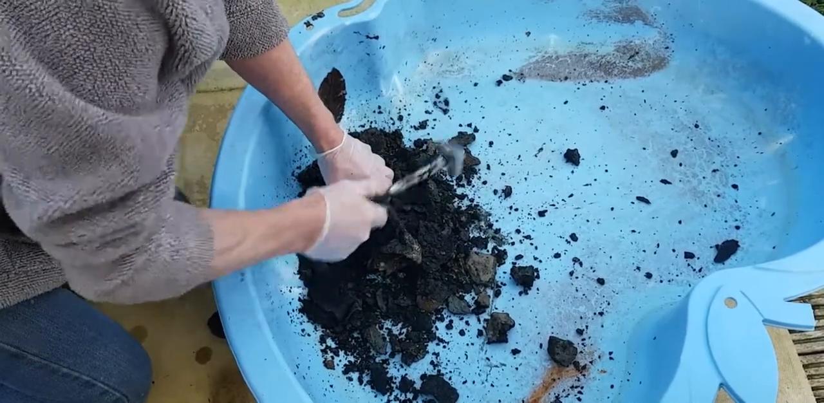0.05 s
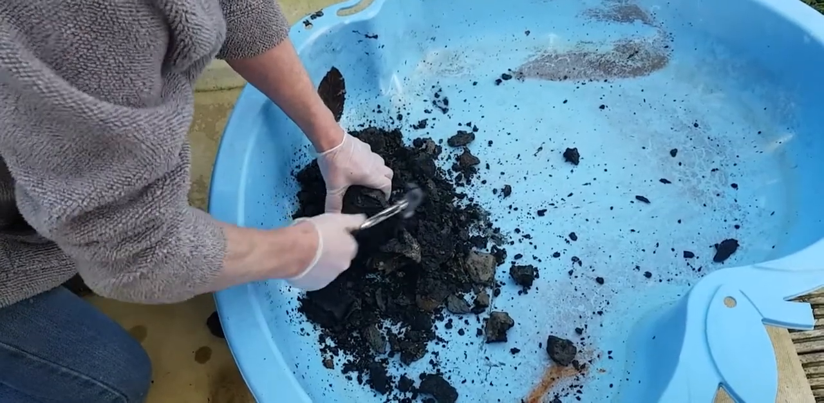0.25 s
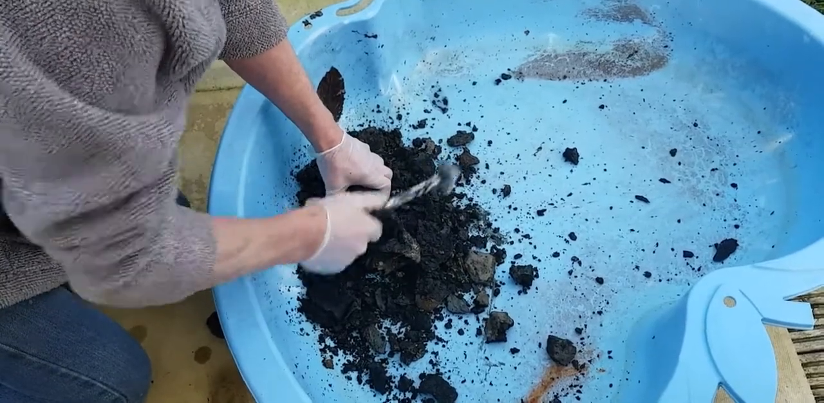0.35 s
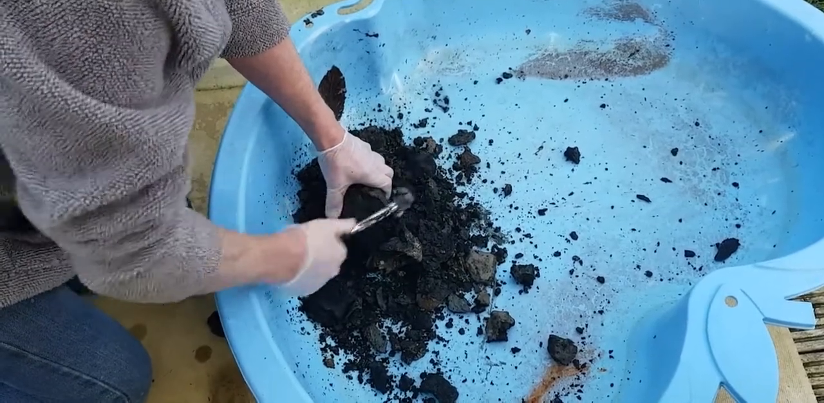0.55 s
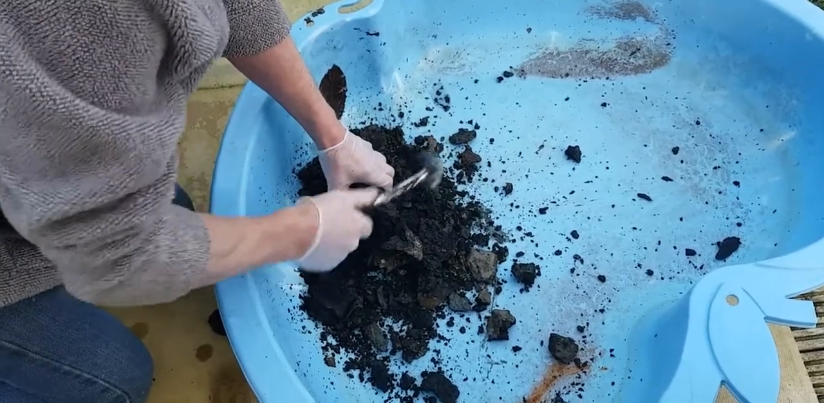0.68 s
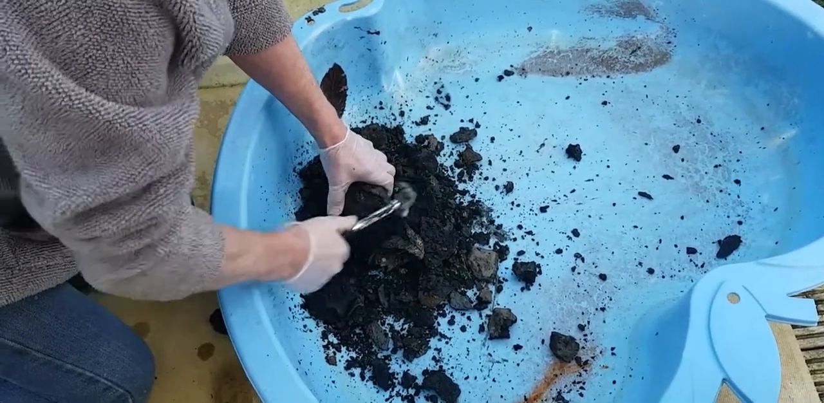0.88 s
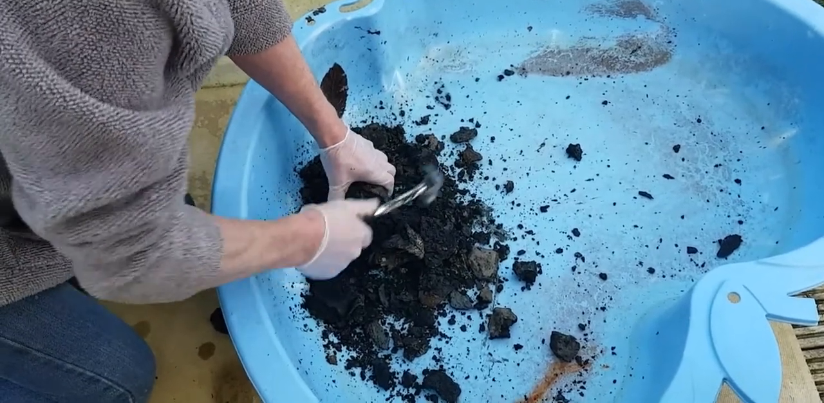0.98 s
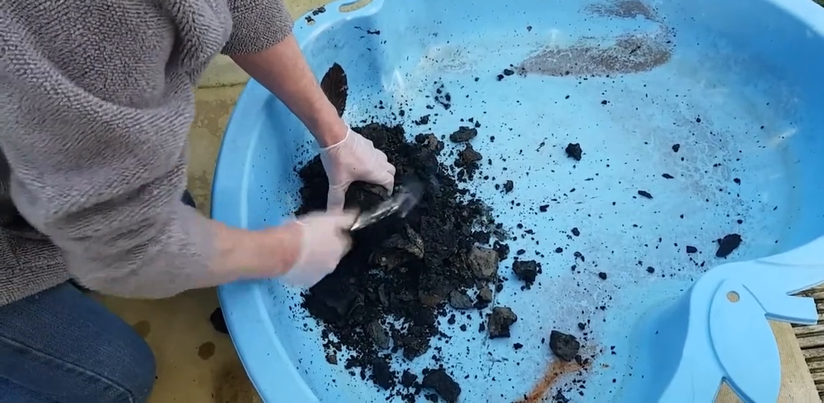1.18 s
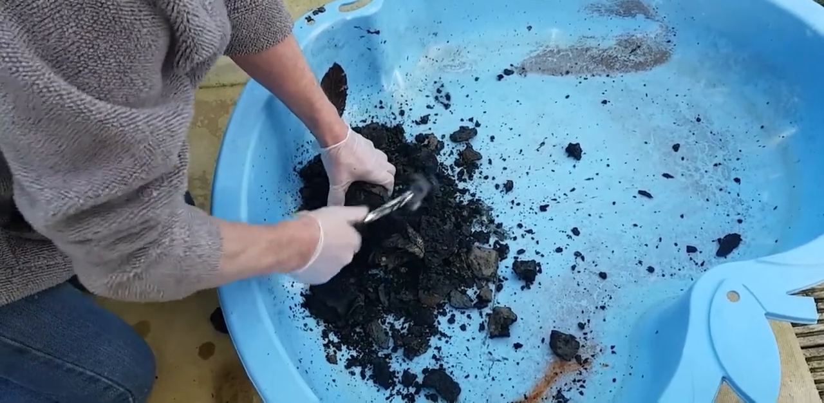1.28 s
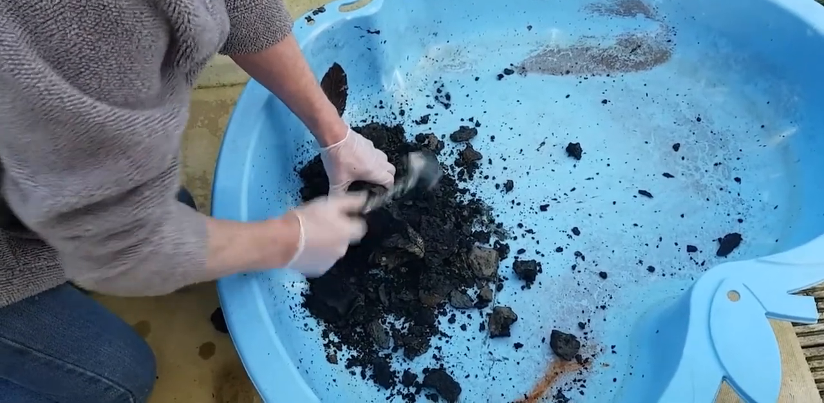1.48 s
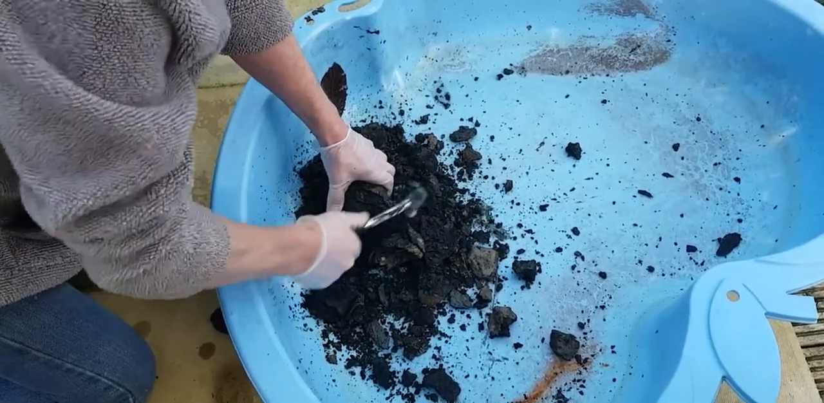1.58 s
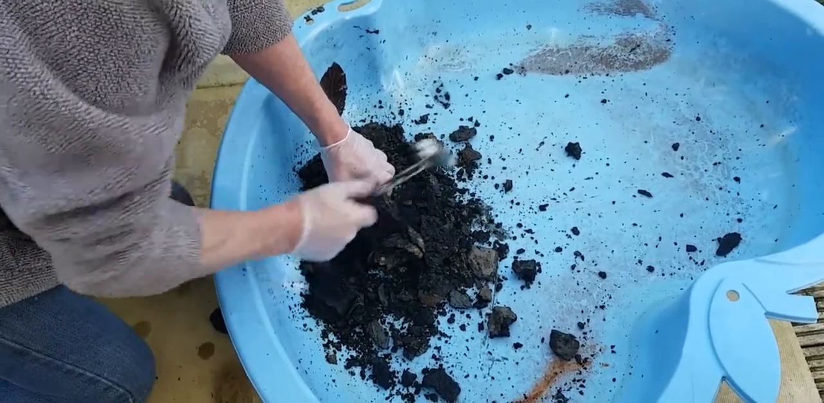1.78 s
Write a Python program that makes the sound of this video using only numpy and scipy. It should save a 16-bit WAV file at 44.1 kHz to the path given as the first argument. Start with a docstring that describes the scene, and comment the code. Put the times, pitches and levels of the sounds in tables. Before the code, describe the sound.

Close by outdoors, steady chopping of damp soil with a hand tool makes a plastic tub knock and boom. Loose soil sprays and ticks on the plastic after each crunchy blow, and some larger clods drop towards the end.

```python
"""Faint outdoor air is heard throughout; at the start, a blow is just dying away in a plastic tub.
Close by, a steel hand tool chops clumps of damp soil in the tub, three blows a second.
Each blow cracks a clump, knocks through the soil and sets the tub's floor booming.
Soil sprays after it, crumbs patter down and now and then the floor gets a soft bump.
Towards the end a few larger clods tumble onto the plastic."""
import sys
import numpy as np
from scipy import signal
from scipy.fft import rfft, irfft, next_fast_len
from scipy.io import wavfile
from scipy.ndimage import map_coordinates

SR = 44100
rng = np.random.default_rng(int(sys.argv[2]) if len(sys.argv) > 2 else 0)


def wrap_up_sound(samples):
    """Save the sound to the file named by the first command line argument, as 16-bit audio."""
    columns = np.atleast_2d(samples).T
    # keep every value between -1 and 1, then stretch to whole-number steps
    tamed = np.clip(columns, -1, 1)
    steps = np.round(tamed * 32767).astype(np.int16)
    wavfile.write(sys.argv[1], SR, steps)


N = 81585
AGE = np.arange(int(.6 * SR)) / SR  # seconds since a sound began

# A fade_s is the time to die away by 60 dB. A width of 0 is the same in both ears.
# blows of the tool: start_s, thud_db, knock_db, knock_pitch_hz, crack_db, crack_pitch_hz
BLOWS = [(-.115, -5, -15.5, 1500, -20, 5050), (0.206, -1, -13, 2010, -15, 4650),
         (0.543, -1.5, -8, 1460, -13.5, 4240), (0.8879, -3.5, -18.5, 1360, -10.5, 8440),
         (1.2155, -1, -9.5, 986, -14, 5170), (1.542, -3, -7.5, 2026, -10.5, 5060)]
# notes the loaded tub rings at: pitch_hz, level_db, fade_s, width
TUB_NOTES = [(72, -24, 0.32, 0.024), (112.8, -26, .173, 0), (142.3, -31, 0.33, 0.026),
             (153.47, -23, 0.4, 0), (195.8, -22.5, 0.24, 0.12), (229.9, -25.5, 0.29, 0.21),
             (244.2, -31.5, 0.34, 0.19), (284.2, -25, .33, 0), (296.7, -26, 0.22, 0.54),
             (352.2, -16, 0.14, 0.16), (413, -31.5, .2, 0.59), (480, -41.5, 0.36, 0.71),
             (601.2, 4.5, 0.068, 0.094), (617.1, -4, 0.16, 0.22), (663.5, -18.5, 0.098, 0.9),
             (689.6, -16, 0.11, 0), (758, -14.5, 0.064, .1), (907, -27.5, 0.1, 1.1),
             (1005.6, -22.5, 0.088, 0.31), (1047, -27, 0.15, 0.43)]
# nearby walls send the thud back: delay_s, level_db
ECHOES = [(.0091, -9), (.0284, -16)]
# crumbs ticking on the plastic: start_s, level_db
CRUMBS = [(0.119, -53.5), (.2875, -47), (0.396, -52), (0.4196, -47.5), (0.437, -51), (0.466, -53),
          (0.66, -52), (0.7484, -49.5), (0.783, -53.5), (0.8245, -50.5), (0.878, -37.5), (1.5141, -43.5),
          (1.765, -50.5)]
# soft bumps on the tub's floor: start_s, level_db, pitch_hz, fade_s
BUMPS = [(0.329, -40, 226, 0.25), (0.389, -35, 112.6, 0.079), (1.7648, -35, 335, 0.062)]
# tumbling clods: start_s, level_db, pitch_hz, fade_s, thud_offset_db
CLODS = [(1.513, -44.5, 1660, 0.054, -15.5), (1.6466, -32.5, 2220, 0.042, -9.5),
         (1.667, -48.5, 2650, 0.1, -9), (1.7371, -38, 1550, 0.088, -2.5), (1.768, -43.5, 1320, 0.046, -7),
         (1.7939, -36, 1510, 0.031, -19)]
# the tone of each sound, from bass to treble: pitch_hz, level_db
AIR_TONE = [(20, -18), (45, 1), (75, -7), (120, -3), (250, -9), (550, -12), (1800, -18), (2900, -33),
            (7000, -38), (16000, -44)]
CRACK_TONE = [(300, -12.5), (1500, 4), (3300, -9), (4600, -2), (7000, -11.5), (9500, -4.5), (11500, -15.5),
              (15500, -19)]
KNOCK_TONE = [(100, -8.5), (400, -8), (800, 2.5), (1300, -0.5), (2000, -5.5), (2800, -13.5), (4000, -23),
              (8000, -27.5), (16000, -83)]
RUMBLE_TONE = [(35, -24.5), (70, -3), (150, 5.5), (290, -4.5), (450, -9), (700, -14.5), (1000, -29),
               (2500, -31), (8000, -45.5)]
SPRAY_TONE = [(300, 5.5), (1200, 8.5), (2200, -2), (3500, -6.5), (5000, -8), (7500, -20), (11000, -18),
              (15500, -27)]
CRUMB_TONE = [(300, -23), (1500, -0.5), (5000, 0.5), (8000, -5), (12000, -6.5), (15500, -7.5)]
# how much louder the work is in the left ear: pitch_hz, left_minus_right_db
LEFT_BOOST = [(100, -0.5), (300, -0.4), (600, -1), (1100, 0.5), (2000, 1), (4000, 2), (8000, 5.5),
              (14000, 5.5)]

CRACK_PEAK_DB, KNOCK_PEAK_DB, PEAK_OCTAVES = 9.5, 10.5, 0.067  # each clump rings at its own pitch


def amp(db):
    return 10 ** (np.asarray(db) / 20)


def unit(x):
    """Scale x to an average power of 1."""
    return x / np.sqrt(np.mean(x ** 2) + 1e-20)


def along(table, hz):
    """Read a table between its listed pitches."""
    pitches, values = np.transpose(table)
    return np.interp(np.log(hz + 1), np.log(pitches + 1), values)


def hump(hz, pitch_hz, octaves):
    """A peak of height 1 around one pitch."""
    return 1 / (1 + (np.log2((hz + 1) / pitch_hz) / octaves) ** 2)


def fade(fade_s, rise_s):
    """Rise quickly, then die away."""
    return np.exp(-np.log(1000) * AGE / fade_s) * (1 - np.exp(-AGE / rise_s))


def coloured(x, tone_db):
    """Filter x to give it a tone; white noise keeps its power."""
    size = 2 * next_fast_len(x.shape[-1])
    gain = unit(amp(tone_db(np.fft.rfftfreq(size, 1 / SR))))
    cepstrum = irfft(np.log(gain + 1e-6))
    cepstrum[1:size // 2] *= 2
    cepstrum[size // 2 + 1:] = 0  # so nothing rings before it is hit
    return irfft(rfft(x, size) * np.exp(rfft(cepstrum)), size)[..., :x.shape[-1]]


def noise(width):
    """An even stereo hiss."""
    mid, side = rng.standard_normal((2, len(AGE)))
    return unit(np.array([mid + width * side, mid - width * side]))


def grit(per_s, width):
    """A stream of tiny clicks of uneven size."""
    return unit(noise(width) * (rng.random(len(AGE)) < per_s / SR))


def add(out, start_s, sound):
    """Mix a sound in, cutting off what does not fit."""
    start = round(start_s * SR)
    first, end = max(start, 0), min(start + sound.shape[-1], N)
    out[:, first:end] += sound[..., first - start:end - start]


def air(level_db=-53, drift_db=-2.28, drifts_per_s=4.2, wide_above_hz=300):
    """Quiet outdoor air gently swells and ebbs, its bass alike in both ears."""
    mid, side = coloured(rng.standard_normal((2, 2 * N)), lambda hz: along(AIR_TONE, hz))[:, N:]
    side = signal.sosfilt(signal.butter(1, wide_above_hz, "high", fs=SR, output="sos"), side)
    drift = map_coordinates(rng.standard_normal(size=64), [np.arange(N) / SR * drifts_per_s])
    return amp(level_db + drift_db * drift) * unit(np.array([mid + side, mid - side]))


def crack(pitch_hz):
    """The blade splits the clump, then crushes its way through."""
    split = noise(width=0.05) * fade(0.0028, rise_s=0.0004)
    crush = amp(-4) * grit(per_s=11000, width=1.0) * fade(0.023, rise_s=0.00011)
    return coloured(split + crush,
                    lambda hz: along(CRACK_TONE, hz) + CRACK_PEAK_DB * hump(hz, pitch_hz, PEAK_OCTAVES))


def knock(pitch_hz):
    """A slap on the plastic makes the tub's many high notes ring briefly."""
    slap = noise(width=0.23) * fade(0.017, rise_s=0.00045)
    ring = amp(-5) * noise(width=0.82) * fade(0.087, rise_s=0.001)
    return coloured(slap + ring,
                    lambda hz: along(KNOCK_TONE, hz) + KNOCK_PEAK_DB * hump(hz, pitch_hz, PEAK_OCTAVES))


def tub_note(pitch_hz, level_db, fade_s, width=0):
    """One note of the tub. Soil cushions its start, and no two hits land quite alike."""
    angle = 2 * np.pi * pitch_hz * AGE
    wave = np.sin(angle) + np.outer([width, -width], np.cos(angle))
    return amp(level_db + 0.06 * rng.normal()) * fade(fade_s, rise_s=0.00038) * wave


def thud():
    """The tub's floor booms, followed by wall echoes and a low rumble."""
    # neighbouring notes swing opposite ways
    ring = sum((-1) ** k * tub_note(*note) for k, note in enumerate(TUB_NOTES))
    ring += tub_note(228.4, -14.5, fade_s=0.11)  # the floor gives way under the blow
    ring -= tub_note(623.7, 6, fade_s=0.015)  # holds the hollow note back at first, so it swells
    ring -= tub_note(601, -32.5, fade_s=0.42)  # that note lingers faintly in the tub
    echoes = sum(amp(level_db) * np.pad(ring, ((0, 0), (round(delay_s * SR), 0)))[:, :len(AGE)]
                 for delay_s, level_db in ECHOES)
    rumble = coloured(noise(width=0.16) * fade(0.35, rise_s=0.0045), lambda hz: along(RUMBLE_TONE, hz))
    return ring + echoes + amp(-24) * rumble


def spray():
    """Fine soil and a few coarse grains scatter after the blow."""
    fine = amp(-29) * grit(per_s=4700, width=1.0) * fade(0.23, rise_s=0.00242)
    coarse = amp(-31) * grit(per_s=280, width=1.0) * fade(0.15, rise_s=0.014)
    return coloured(fine + coarse, lambda hz: along(SPRAY_TONE, hz))


def chopping(thud_delay_s=0.0006):
    """Each blow cracks and knocks, then thuds and sprays an instant later."""
    out = np.zeros((2, N))
    for start_s, thud_db, knock_db, knock_hz, crack_db, crack_hz in BLOWS:
        add(out, start_s, amp(knock_db) * knock(knock_hz) + amp(crack_db) * crack(crack_hz))
        add(out, start_s + thud_delay_s, amp(thud_db) * (thud() + spray()))
    return out


def crumbs():
    """Light crumbs land on the plastic with short, bright ticks."""
    out = np.zeros((2, N))
    for start_s, level_db in CRUMBS:
        tick = grit(per_s=5800, width=0.8) * fade(0.039, rise_s=0.0002)
        add(out, start_s, amp(level_db) * coloured(tick, lambda hz: along(CRUMB_TONE, hz)))
    return out


def bumps():
    """Soft bumps on the tub's floor sound low and dull."""
    out = np.zeros((2, N))
    for start_s, level_db, pitch_hz, fade_s in BUMPS:
        push = noise(width=0.16) * fade(fade_s, rise_s=0.00063)
        bump = coloured(push, lambda hz: 40 * np.log10(hump(hz, pitch_hz, octaves=0.54)))
        add(out, start_s, amp(level_db) * bump)
    return out


def clods():
    """Larger clods clatter down, and the tub answers each with a faint thud."""
    out = np.zeros((2, N))
    for start_s, level_db, pitch_hz, fade_s, thud_offset_db in CLODS:
        crunch = grit(per_s=5400, width=0.54) * fade(fade_s, rise_s=0.00026)
        clatter = coloured(crunch, lambda hz: 20 * np.log10(hump(hz, pitch_hz, octaves=0.45)))
        add(out, start_s, amp(level_db) * (clatter + amp(thud_offset_db) * thud()))
    return out


def scene(left_lead_s=0.00008):
    """The work is a little to the left, so it reaches that ear sooner and brighter."""
    work = chopping() + crumbs() + clods() + bumps()
    size = next_fast_len(N + SR // 2)
    hz = np.fft.rfftfreq(size, 1 / SR)
    ear_share = np.array([[.5], [-.5]])
    balance = amp(ear_share * along(LEFT_BOOST, hz))
    time_shift = np.exp(2j * np.pi * hz * ear_share * left_lead_s)
    return irfft(rfft(work, size) * balance * time_shift, size)[:, :N] + air()


def record(dry, low_cut_hz=19, top_hz=16300):
    """The recorder drops the deepest bass, rounds off loud peaks and cuts the highest treble."""
    trimmed = signal.sosfilt(signal.butter(2, low_cut_hz, "high", fs=SR, output="sos"), dry)
    rounded = trimmed / (1 + np.abs(trimmed) ** 8) ** (1 / 8)
    return signal.sosfilt(signal.ellip(10, .1, 90, top_hz, fs=SR, output="sos"), rounded)


dry = scene()
out = record(dry)
wrap_up_sound(out)
```